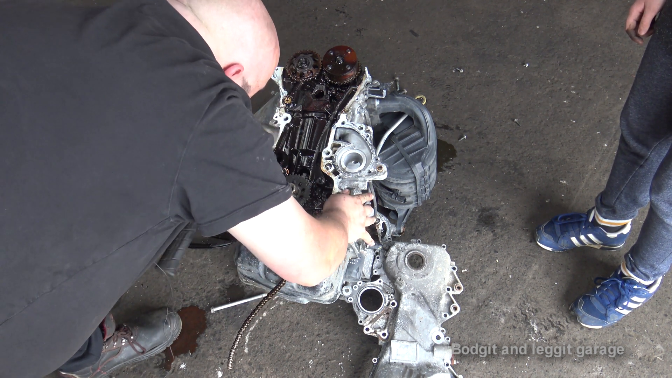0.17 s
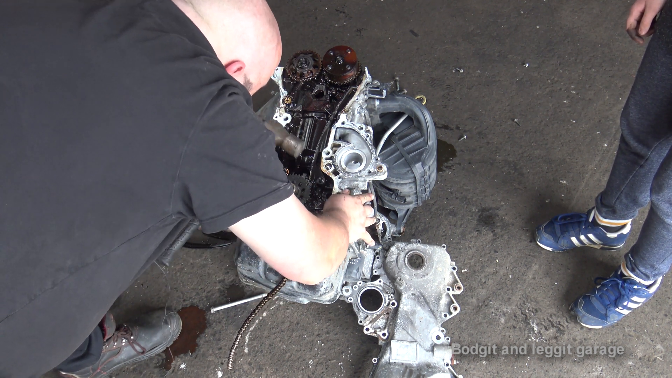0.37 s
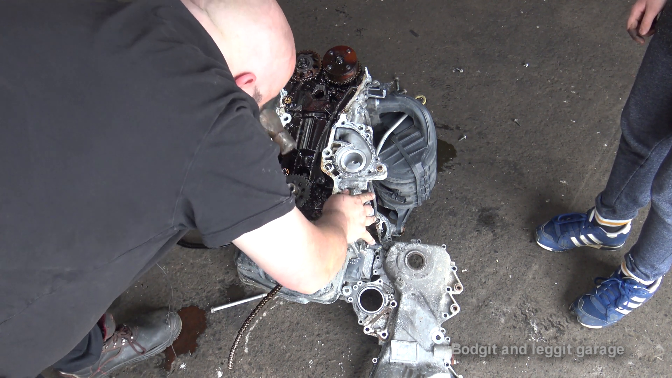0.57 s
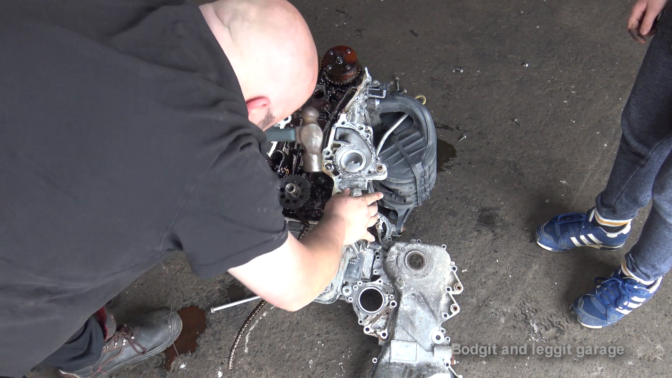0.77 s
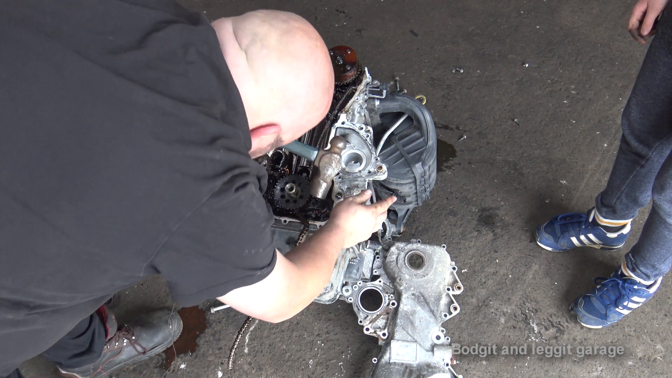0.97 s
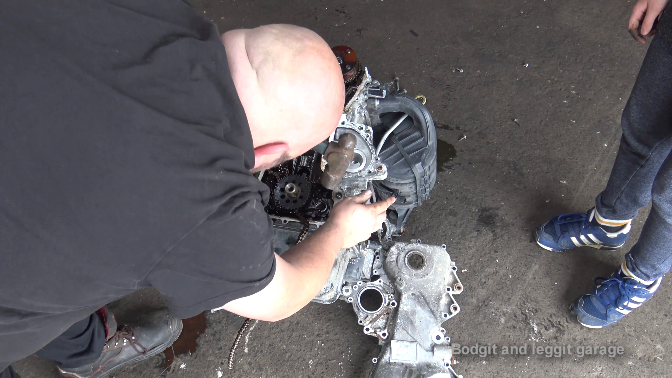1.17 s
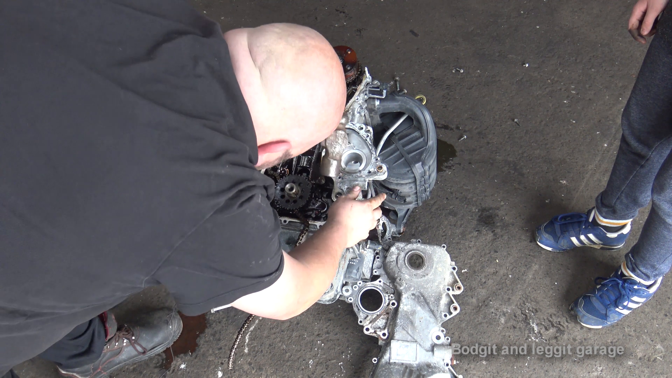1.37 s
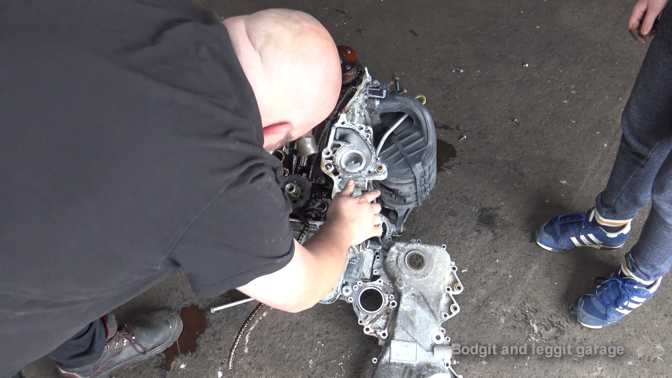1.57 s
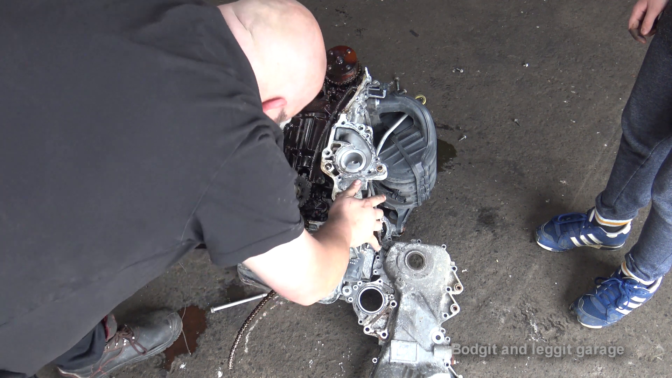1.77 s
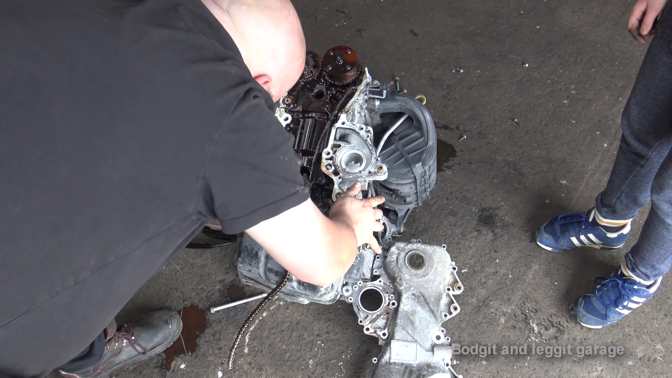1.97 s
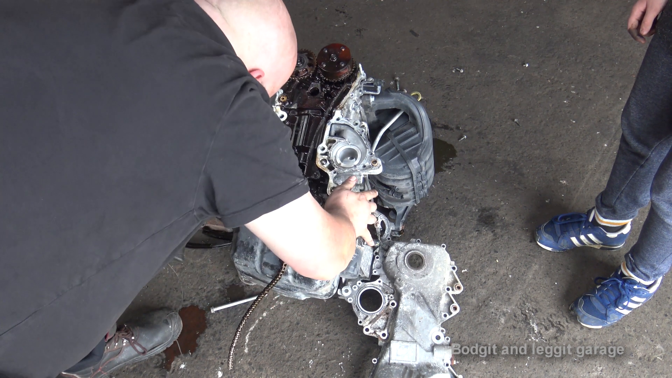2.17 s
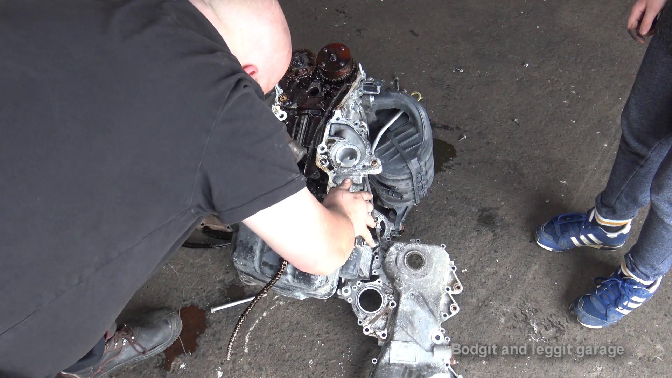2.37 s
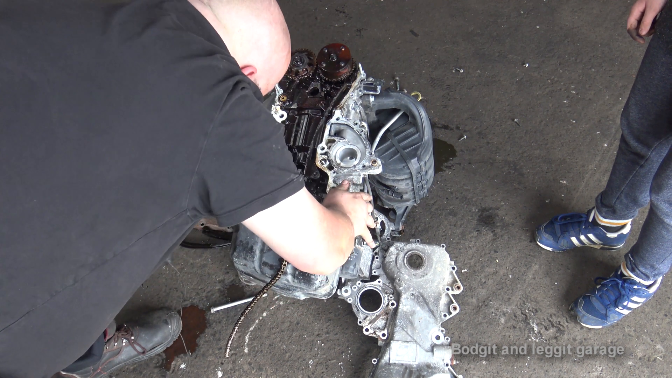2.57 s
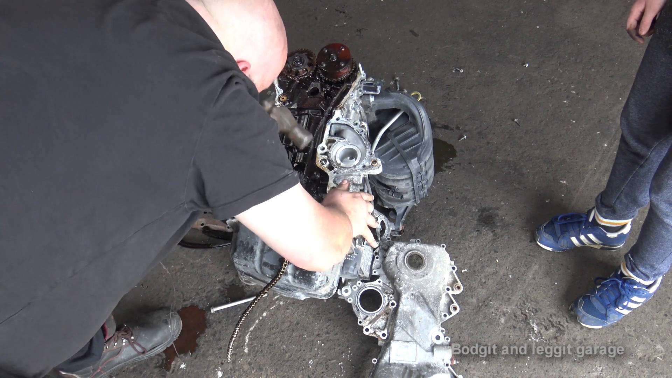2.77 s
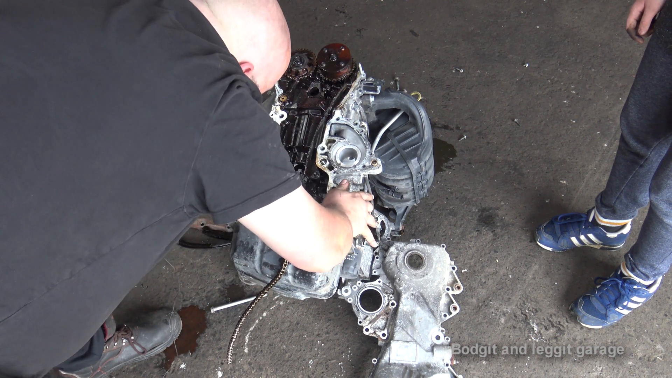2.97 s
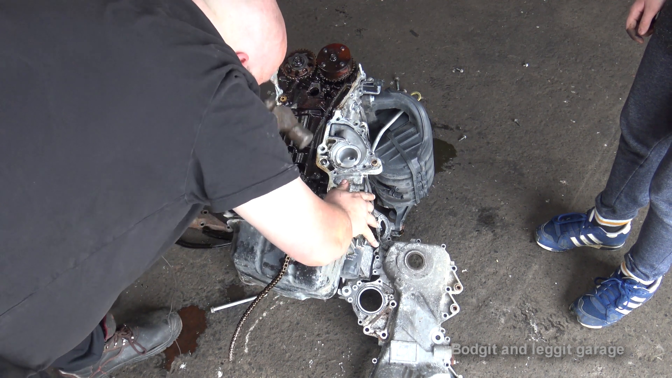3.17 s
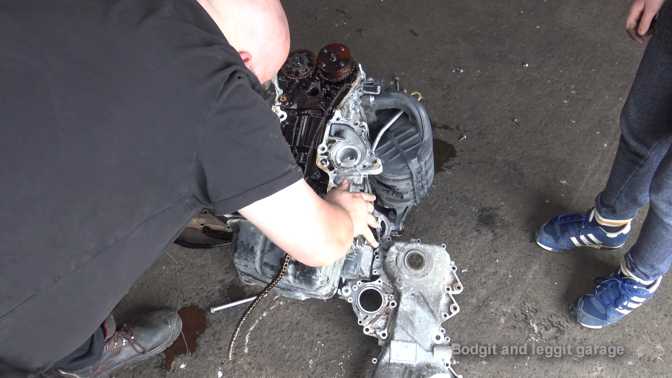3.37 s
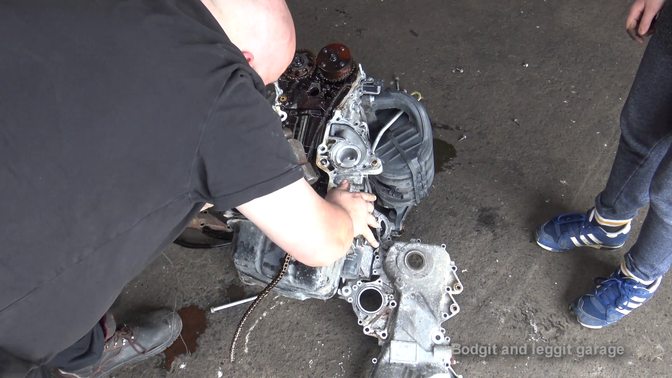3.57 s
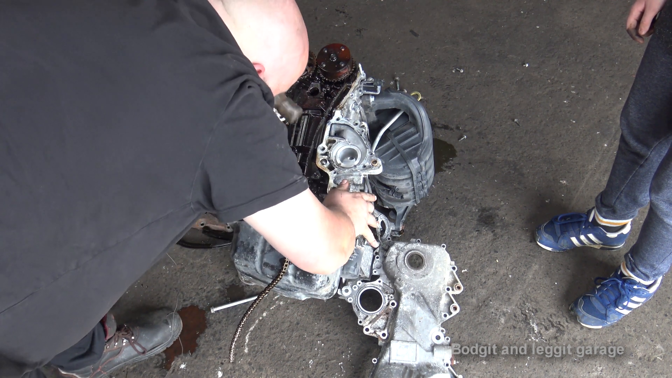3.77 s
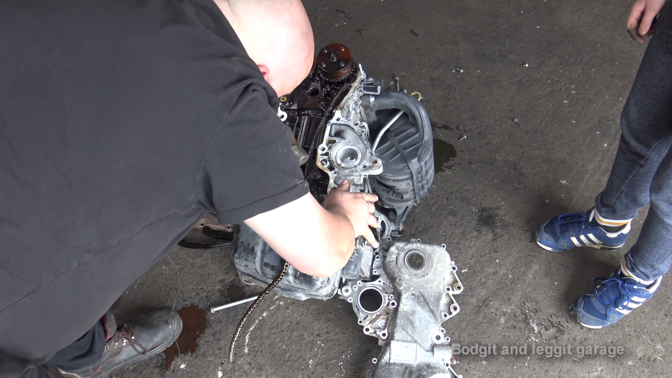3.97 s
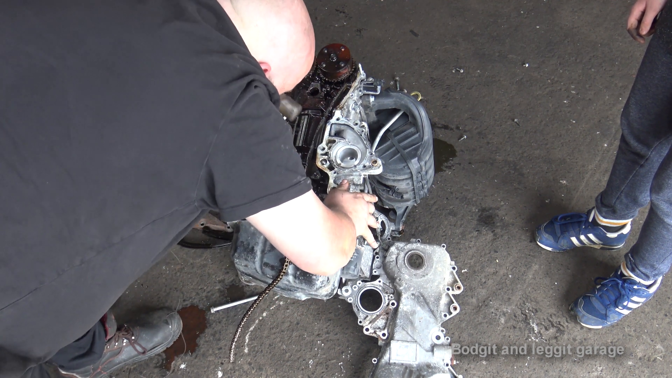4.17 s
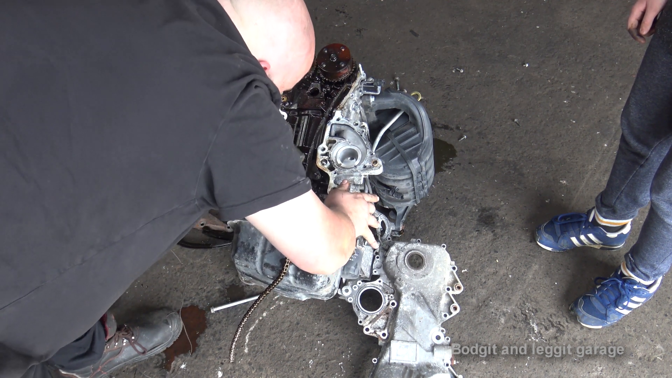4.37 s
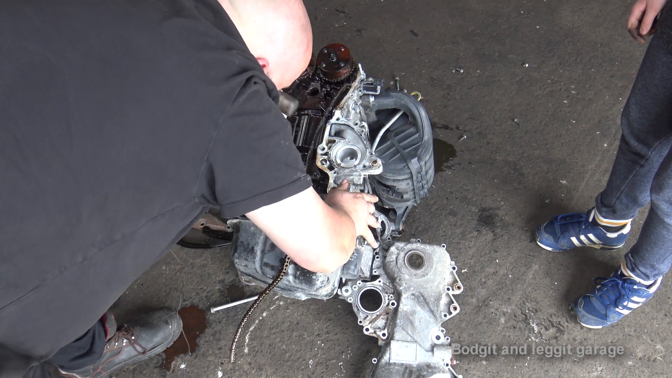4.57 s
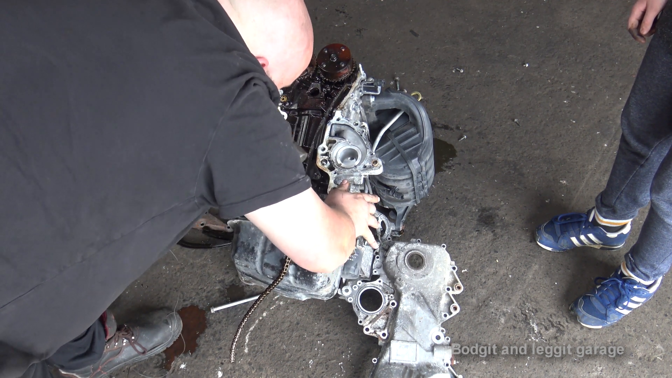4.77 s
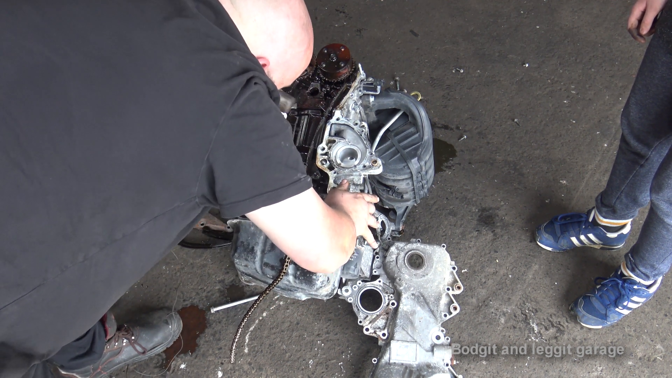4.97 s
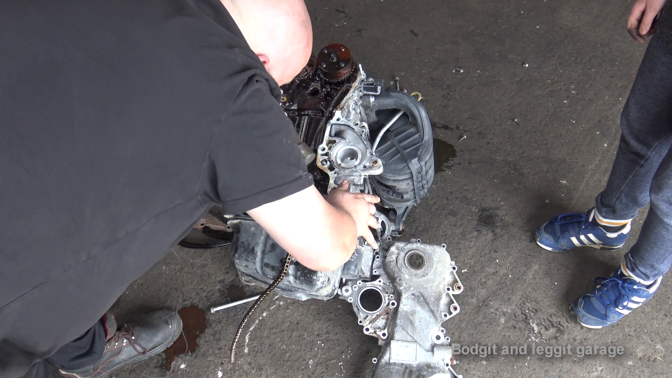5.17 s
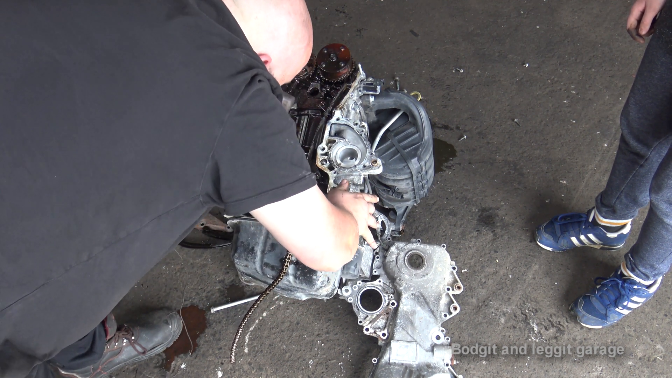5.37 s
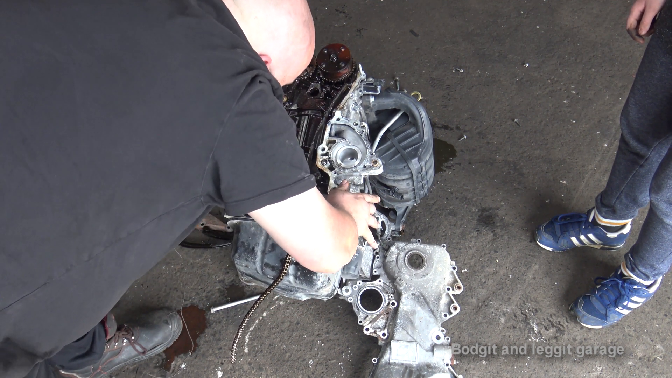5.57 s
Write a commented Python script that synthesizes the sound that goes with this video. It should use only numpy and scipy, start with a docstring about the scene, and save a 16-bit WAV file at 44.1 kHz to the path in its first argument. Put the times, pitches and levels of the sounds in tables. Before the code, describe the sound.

Two sharp, ringing metal taps sound in a workshop, heard from close above as a hammer hits a steel part in an aluminium engine. A short lull holds only a soft bump and a faint knock. Then comes a steady run of ten blows, the first followed by a light rattle and scrape. The clanks grow tighter, each with a slight floor thud and short echo, over quiet room rumble.

```python
"""Hammer tapping a steel part on a bare engine on a garage floor: opening blows, a pause, a steady run. Each
blow cracks, rings the aluminium casting and, until it is driven home, the part, and shakes the floor; the sound
dies away in the workshop. The hammer touches down again lightly after a blow; the loose part knocks lightly,
then rattles and grates as it shifts. A soft bump and a low room rumble lie underneath."""
import sys
import numpy as np
from scipy import signal
from scipy.fft import rfft, irfft
from scipy.io import wavfile

SR = 44100
rng = np.random.default_rng(int(sys.argv[2]) if len(sys.argv) > 2 else 0)


def wrap_up_sound(samples):
    """Save the sound to the file named by the first command line argument, as 16-bit audio."""
    columns = np.atleast_2d(samples).T
    # keep every value between -1 and 1, then stretch to whole-number steps
    tamed = np.clip(columns, -1, 1)
    steps = np.round(tamed * 32767).astype(np.int16)
    wavfile.write(sys.argv[1], SR, steps)


N = 247577
LEAD = SR // 4  # samples ahead of t = 0
EDGE_HZ = 16000

# hammer blows: t/s, force/dB, hollowness of the spot near 1.3 kHz/dB, slack of the part/0-1
HAMMER_BLOWS = [(-.065, -0.5, 2.5, 1), (0.2816, -2.5, 4.5, 0.9), (2.0106, -4, 6, 0.87),
                (2.3498, -2.5, 0.5, 0.65), (2.7005, -8.5, -1, 0.08), (3.1247, -3.5, 3, 0.16),
                (3.5438, -4.5, 8, 0.33), (4.006, -3, -3, 0.21), (4.4072, -6, 4.5, 0.23),
                (4.7888, 0.5, -4.5, 0.16), (5.185, -4, -3, 0), (5.5572, -2.5, 0, 0.2)]
# casting modes: f/Hz, level/dB, t60/s
CASTING_MODES = [(300.3, -43, 0.2), (477.6, -40, 0.2), (550, -39, 0.17), (626, -38, 0.19), (663, -37, 0.22),
                 (733, -43, .2), (866.3, -40.5, 0.14), (992, -51, 0.54), (1361, -40, 0.1),
                 (1370, -44, 0.25), (1500, -50, 0.058), (1755, -49.5, 0.2), (1790, -60.5, .7),
                 (2060, -41.5, 0.05), (1957, -55, 0.73), (2020, -61.5, .7), (1920, -46, 0.12),
                 (2310, -46, 0.078), (2400, -51, 0.063), (2980, -44, 0.18), (2960, -50, 0.059),
                 (3040, -43.5, 0.17), (3100, -42, 0.069), (3280, -49, 0.21), (3980, -55.5, .1),
                 (3790, -39, 0.088), (4200, -48.5, 0.054), (3800, -52, 0.078), (4660, -47, 0.12),
                 (4694, -36, 0.082)]


def gain_of(db):
    """Decibels to amplitude."""
    return 10 ** (np.asarray(db) / 20)


def unit(x):
    """Scale to energy 1."""
    return x / np.sqrt(np.sum(x ** 2) + 1e-20)


def curve_at(points, hz):
    """Interpolate over log frequency."""
    f, value = np.transpose(points)
    return np.interp(np.log(hz + 1), np.log(f + 1), value)


def add(mix, at_s, sound):
    """Mix a sound in at at_s."""
    part = mix[LEAD + round(at_s * SR):][:len(sound)]
    part += sound[:len(part)]


def colour(x, points, size=4096):
    """Minimum-phase filter; points: f/Hz, gain/dB."""
    log_gain = np.log(gain_of(curve_at(points, abs(np.fft.fftfreq(size, 1 / SR)))))
    taps = np.fft.ifft(np.exp(np.conj(signal.hilbert(log_gain)))).real[:size // 2]
    return signal.fftconvolve(x, taps)[:len(x)]


def sines(modes, t):
    """Damped sines, one row a mode."""
    hz, db, t60_s = np.transpose(modes)[:, :, None]
    return gain_of(db - 60 * t / t60_s) * np.sin(2 * np.pi * hz * t)


def engine_modes(t, count=520):
    """The engine's close, quickly damped modes, one row each, denser in the bass."""
    # clank spectrum: f/Hz, density/dB
    spectrum = [(120, -11.5), (190, 0), (380, -8.5), (600, 2), (900, -2), (1200, -10), (1700, 0.5),
                (2500, -1.5), (3200, -3), (4200, 0), (5300, -6.5), (6500, -7.5), (8000, -13),
                (16000, -19.5)]
    # clank decay: f/Hz, t60/s
    decay = [(150, 0.075), (700, .09), (2000, 0.12), (4500, 0.062), (7000, 0.028), (15000, 0.033)]
    place = (np.arange(count) + rng.random(count))[:, None] / count
    hz = 110 + EDGE_HZ * place ** 2
    t60_s = curve_at(decay, hz)
    size = gain_of(curve_at(spectrum, hz)) * np.sqrt(place / t60_s)
    return unit(size) * 1e-3 ** (t / t60_s) * np.sin(2 * np.pi * hz * t)


def casting_ring(t):
    """The struck spot varies each casting mode's share and sign."""
    count = len(CASTING_MODES)
    share = rng.choice([-1, 1], count) * gain_of(2 * rng.standard_normal(count))
    return share @ sines(CASTING_MODES, t)


def contact_burst(t, decay_s):
    """Tiny contacts dying away; flat spectrum, energy 1."""
    envelope = np.exp(-t / decay_s)
    x = rng.standard_normal(len(t)) * envelope
    for _ in range(2):
        z = rfft(x)
        x = irfft(z / (abs(z) + 1e-12), len(t)) * np.sqrt(envelope)
    return unit(x)


def crack(t, slack, crack_s=0.0019, chatter_s=0.0059, rebound_s=0.0018, reseat_s=0.0078):
    """Contact crack; a slack part turns it into chatter, then drops back into its seat."""
    # crack spectrum: f/Hz, density/dB
    spectrum = [(60, -12), (180, 3.5), (490, 5.5), (1200, -14.5), (1800, -2), (2500, 8), (3200, -2.5),
                (3950, 5), (5200, -9), (6500, 2), (7900, -9), (9600, -1), (12500, -10), (16000, -14.5)]
    contacts = [(0, gain_of(4) * np.sqrt(1 - slack), crack_s),
                (rebound_s, gain_of(4) * np.sqrt(slack), crack_s + chatter_s * slack),
                (reseat_s, gain_of(1) * slack, crack_s)]
    out = np.zeros(len(t))
    for delay_s, size, decay_s in contacts:
        contact = unit(colour(contact_burst(t, decay_s), spectrum))
        out += size * np.roll(contact, round(delay_s * SR))
    return out


def steel_ring(t, at_s, free_db=2.5, seated_db=-21, binds_s=2.45, bind_db_per_s=29.5):
    """The part rings freely until it binds, then less as it is driven home."""
    # steel part modes: f/Hz, level/dB, t60/s
    modes = [(5521, -46, .24), (6791, -31, .033), (8465, -52, .32), (9878, -37, .04), (11886, -43, .085),
             (15730, -41, .035)]
    ring_db = max(free_db - bind_db_per_s * max(at_s - binds_s, 0), seated_db)
    return gain_of(ring_db) * sines(modes, t).sum(0)


def hammer(clank_db=-21.5, casting_db=2, wander=1.31):
    """Each blow cracks and rings engine and part; a hollow spot rings the casting more."""
    out, t = np.zeros(LEAD + N), np.arange(SR // 3) / SR
    modes = engine_modes(t)
    spot = rng.choice([-1, 1], len(modes))
    for at_s, force_db, hollow_db, slack in HAMMER_BLOWS:
        slack = np.clip(slack, 0.05, 0.9)
        blow = gain_of(clank_db) * (spot + wander * rng.standard_normal(len(spot))) @ modes
        blow += gain_of(casting_db + 0.16 * hollow_db) * casting_ring(t)
        blow += crack(t, slack)
        # light blows, hollow spots and slack sound heavier
        weight_db = -4 - 0.95 * force_db + 0.1 * hollow_db + 8.5 * slack
        # treble grows more slowly than force; slack dulls it
        bright_db = -4.5 - 0.89 * force_db - 7 * slack ** 2
        tone = [(200, 0), (480, weight_db), (800, weight_db), (1350, hollow_db),
                (2100, 0), (4200, 0), (6500, bright_db)]
        add(out, at_s, gain_of(force_db) * (colour(blow, tone) + steel_ring(t, at_s)))
    return out


def boom(swell_s=0.005, db_per_force_db=0.3, slack_loss_db=4.8):
    """Blows shake the floor and drive the room's standing waves; a firm seat passes more."""
    # standing waves: f/Hz, level/dB, t60/s
    modes = [(94.5, -40, 0.53), (97.3, -48.5, 0.48), (69, -52, 0.51)]
    out, t = np.zeros(LEAD + N), np.arange(SR) / SR
    wave = sines(modes, t).sum(0) * (1 - np.exp(-t / swell_s))
    for at_s, force_db, _, slack in HAMMER_BLOWS:
        add(out, at_s, gain_of(db_per_force_db * force_db - slack_loss_db * slack) * wave)
    return out


def workshop(x, floor_s=0.0083, build_s=0.008, wall_s=0.092, wall_width_s=0.0083, wall_db=-5):
    """Add a bounce off the concrete and a diffuse tail that swells as the far walls answer."""
    # floor echo, shaded by the engine: f/Hz, level/dB
    bounce_spectrum = [(300, -12), (800, -18), (3000, -18.5), (6000, -11), (14000, -27)]
    # tail strength: f/Hz, level/dB
    tail_spectrum = [(60, -9), (150, -11), (300, -13), (600, -19), (1000, -10), (1500, -13.5),
                     (1900, -16.5), (3000, -22.5), (4300, -17.5), (6000, -22), (10000, -22.5), (16000, -23)]
    # tail decay: f/Hz, t60/s
    decay = [(80, 1), (300, .85), (1000, .8), (2000, .9), (4500, .8), (9000, .62), (16000, .45)]
    t = np.arange(SR) / SR
    hz, frame_s, noise = signal.stft(rng.standard_normal(SR), SR, nperseg=256)
    t60_s = curve_at(decay, hz)[:, None]
    tail = signal.istft(noise * 1e-3 ** (frame_s / t60_s), SR, nperseg=256)[1][:SR]
    tail *= 1 - np.exp(-(t / build_s) ** 2)
    tail *= 1 + gain_of(wall_db) * np.exp(-((t - wall_s) / wall_width_s) ** 2)
    bounce = colour(signal.unit_impulse(SR, round(floor_s * SR)), bounce_spectrum)
    return x + signal.fftconvolve(x, colour(unit(tail), tail_spectrum) + bounce)[:len(x)]


def air(rms_db=-60):
    """Steady low rumble and faint hiss of the garage."""
    # still room: f/Hz, density/dB
    spectrum = [(12, -36), (25, -19), (45, -12), (62, -2), (88, -13), (200, -17), (320, -17), (420, -22),
                (660, -21), (1000, -21), (1700, -28), (3300, -40), (8000, -55), (16000, -69)]
    shape = gain_of(curve_at(spectrum, np.fft.rfftfreq(N, 1 / SR)))
    noise = irfft(rfft(rng.standard_normal(N)) * shape, N)
    return gain_of(rms_db) * np.sqrt(N) * unit(noise)


def rattle(gain_db=4, contact_s=0.004, grip_s=0.013):
    """Light knocks on the casting, quickly damped: the hammer touches down again just after a blow, and the
    loose part, held by a hand, knocks softly as it shifts."""
    # light knocks: t/s, force/dB
    knocks = [(.354, -23), (1.139, -24.5), (2.069, -14), (2.099, -12.5), (2.148, -13.5), (2.166, -12),
              (2.194, -6.5), (2.229, -13)]
    out, t = np.zeros(LEAD + N), np.arange(SR // 8) / SR
    modes = engine_modes(t)
    softness = [(700, 0), (1100, -6), (3800, -20), (6000, -32), (16000, -44)]
    for at_s, force_db in knocks:
        clank = unit(rng.choice([-1, 1], len(modes)) @ modes)
        body = (clank + unit(casting_ring(t))) * np.exp(-t / grip_s)
        knock = unit(signal.fftconvolve(contact_burst(t, contact_s), body)[:len(t)])
        add(out, at_s, gain_of(gain_db + force_db) * colour(knock, softness))
    return out


def bump(rise_s=0.0056):
    """Dull bump on the floor as the worker shifts his weight."""
    # floor bumps: t/s, level/dB
    bumps = [(0.919, -34)]
    # thud modes: f/Hz, level/dB, t60/s
    modes = [(55, -0.5, 0.086), (135, -1.5, 0.048), (179, -4, 0.051), (293, -8, .04)]
    out, t = np.zeros(LEAD + N), np.arange(SR // 4) / SR
    thud = sines(modes, t).sum(0) * (1 - np.exp(-t / rise_s))
    for at_s, level_db in bumps:
        add(out, at_s, gain_of(level_db) * thud)
    return out


def scrape(start_s=2.06, rise_s=0.094, hold_s=0.068, release_s=0.017,
           gain_db=-23, slips_per_s=450, grip_s=0.012):
    """The part grates over the casting in tiny slips as the push builds, holds and lets go."""
    t, slide_s = np.arange(SR // 16) / SR, np.arange(-LEAD, N) / SR - start_s
    modes = engine_modes(t)
    body = unit(rng.choice([-1, 1], len(modes)) @ modes * np.exp(-t / grip_s))
    slips = rng.standard_normal(LEAD + N) * (rng.random(LEAD + N) < slips_per_s / SR)
    release = 1 - (slide_s - rise_s - hold_s) / release_s
    push = np.clip(np.minimum(slide_s / rise_s, release), 0, 1)
    grating = signal.fftconvolve(slips * push, body)[:LEAD + N]
    tone = [(300, 2), (700, 0), (1100, -4), (3800, -6), (6000, -16), (16000, -26)]
    return gain_of(gain_db) * colour(grating, tone)


def scene():
    """All sources in the room, heard from above the engine; mono."""
    metal = workshop(hammer() + rattle() + scrape())
    return ((metal + boom() + bump())[LEAD:] + air())[None]


def record(dry):
    """Low-pass at EDGE_HZ."""
    taps = signal.firwin(255, EDGE_HZ, window=("kaiser", 9), fs=SR)
    return signal.oaconvolve(dry, taps[None], "same")


dry = scene()
out = record(dry)
wrap_up_sound(out)
```